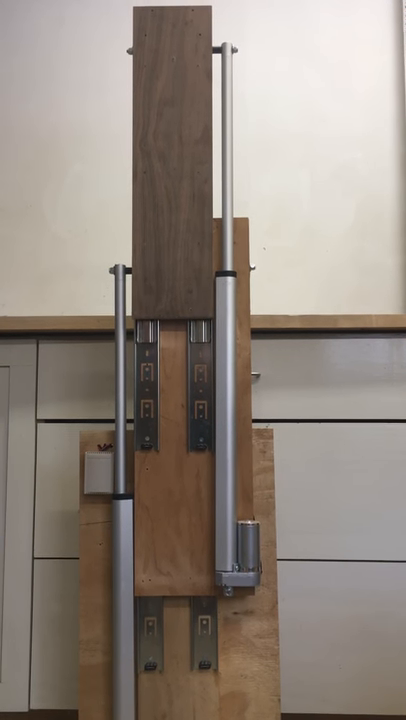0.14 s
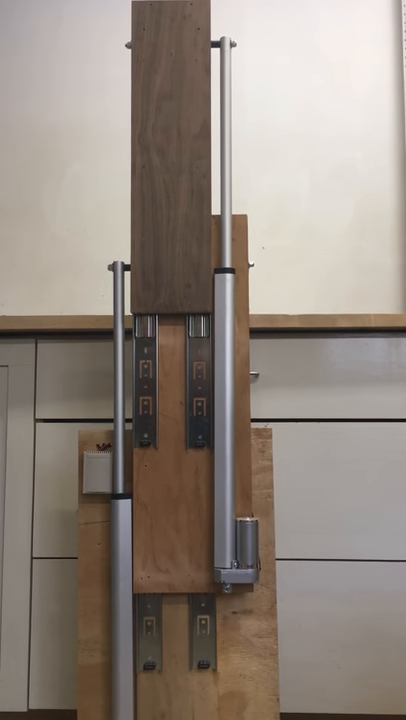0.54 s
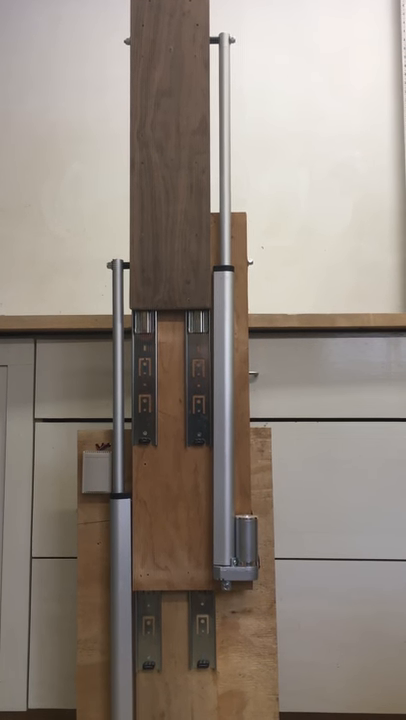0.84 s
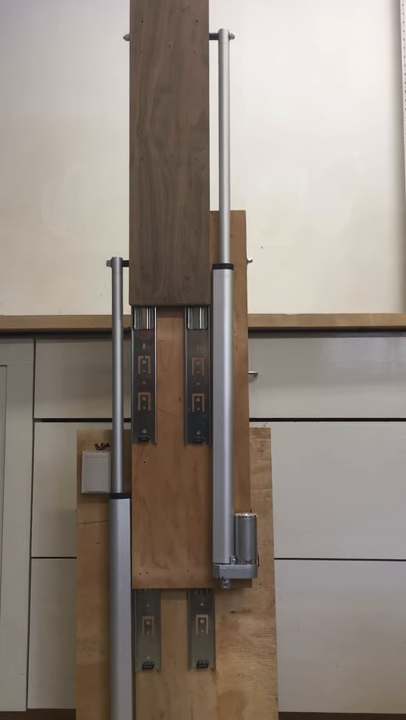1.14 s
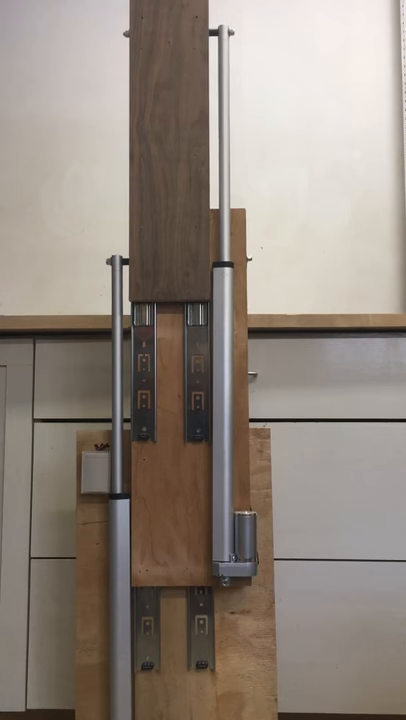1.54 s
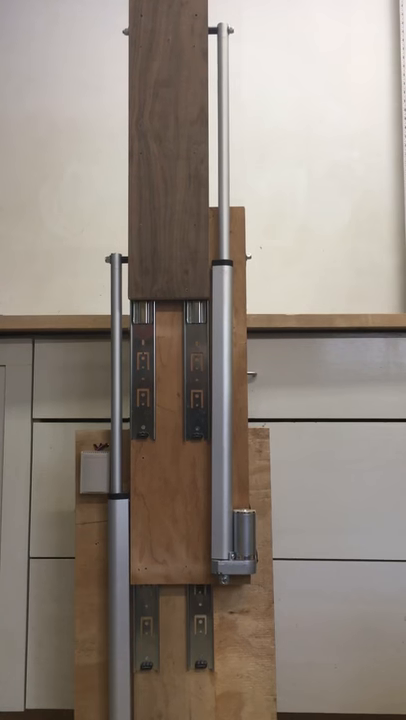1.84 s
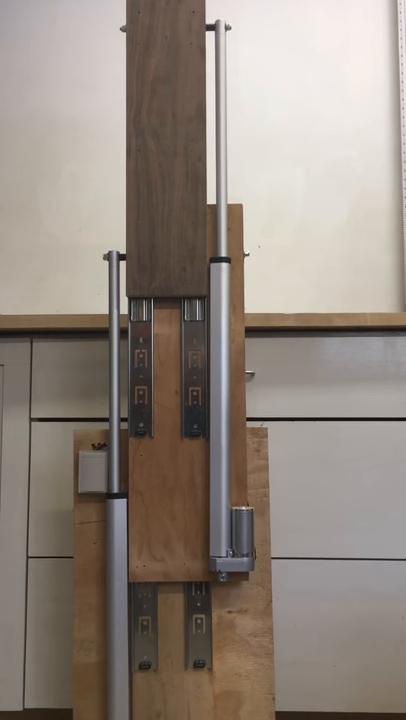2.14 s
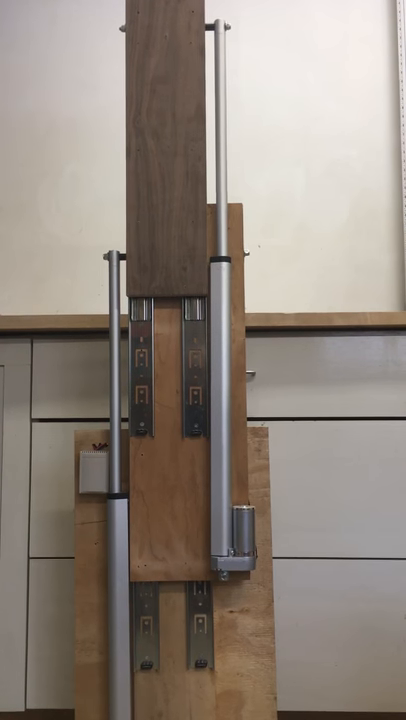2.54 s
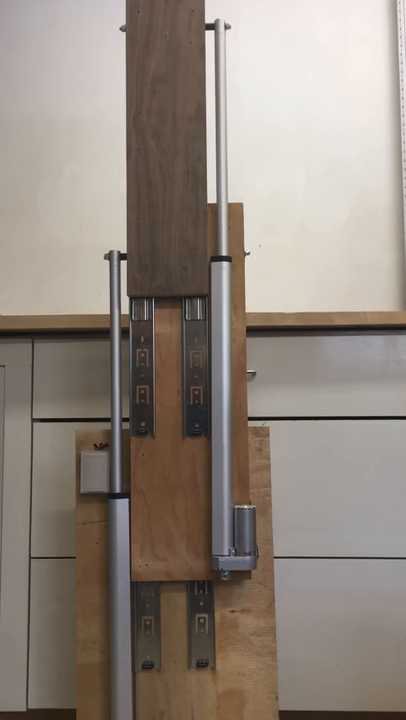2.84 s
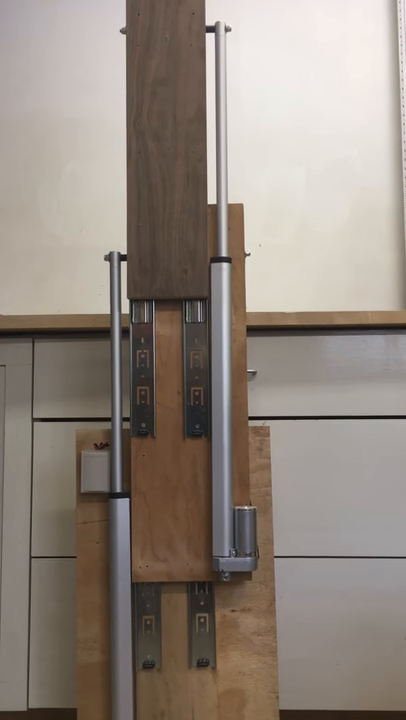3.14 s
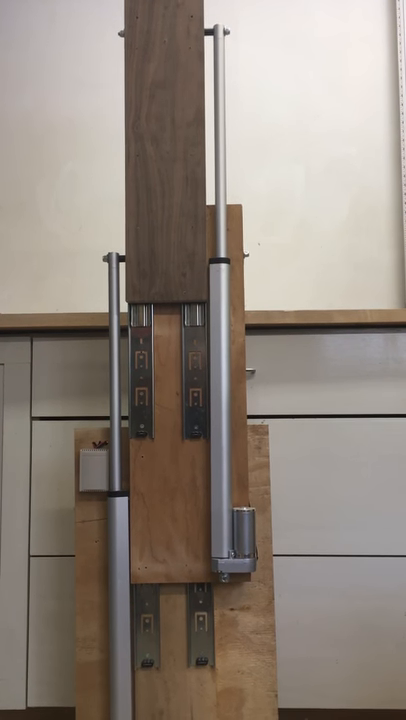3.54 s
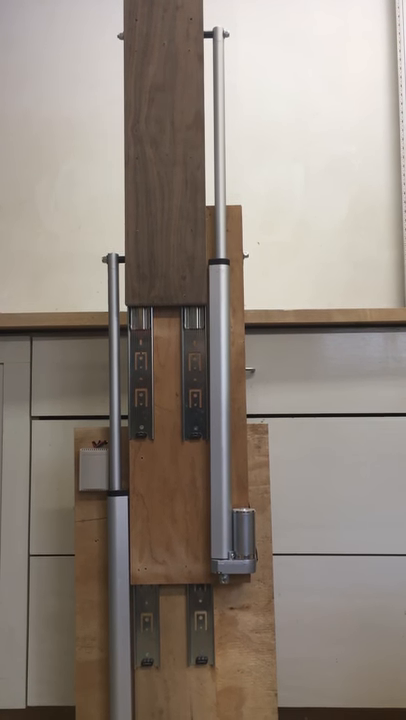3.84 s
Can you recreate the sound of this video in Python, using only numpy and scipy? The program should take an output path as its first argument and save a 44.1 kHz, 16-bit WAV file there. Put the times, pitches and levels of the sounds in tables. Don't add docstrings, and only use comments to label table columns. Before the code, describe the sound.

Geared motor whine with gritty tooth rattle halts, sharp clicks follow, and the whine restarts

```python
import sys
import numpy as np
from scipy import signal
from scipy.fft import rfft, irfft
from scipy.io import wavfile
from scipy.ndimage import uniform_filter1d

SR = 44100
rng = np.random.default_rng(int(sys.argv[2]) if len(sys.argv) > 2 else 0)


def invert_db(x):
    u = np.asarray(x, float) / 20
    return 10 ** u


def dump(signal):
    limited = np.clip(np.atleast_2d(signal).T, -1, 1)
    pcm = np.round(limited * 32767).astype(np.int16)
    wavfile.write(sys.argv[1], SR, pcm)


N = 176400


def level(x, db):
    return x * invert_db(db) / np.sqrt(np.mean(x ** 2) + 1e-30)


def ring(x, hz, width):
    b, a = signal.iirpeak(min(hz, SR * 0.45), max(hz / width, 0.3), fs=SR)
    return signal.lfilter(b, a, x)


def colour(x, points, peaks=()):
    hz, db = np.array(points, float).T
    f = np.maximum(np.arange(4097) * SR / 8192, 1)
    low_fall_db = 14 * np.minimum(np.log2(f / hz[0]), 0)
    power = invert_db(2 * (np.interp(np.log(f), np.log(hz), db) + low_fall_db))
    for centre, width, peak_db in peaks:
        power = power + invert_db(2 * peak_db) / (1 + ((f - centre * centre / f) / width) ** 2) ** 2
    cepstrum = irfft(np.log(power) / 2)
    cepstrum[1:4096] *= 2
    cepstrum[4097:] = 0
    response = irfft(np.exp(rfft(cepstrum)))
    return signal.fftconvolve(x, response)[:N]


def walk(rate):
    hold = int(SR / rate)
    steps = np.repeat(rng.standard_normal(N // hold + 1), hold)
    return 1.3 * uniform_filter1d(uniform_filter1d(steps, hold), hold)[:N]


def mesh_song(tones, turns, speed, go, flutter_db):
    wobble = turns + np.cumsum(speed * 0.001 * walk(29.93)) / SR
    song = np.zeros(N)
    for multiple, db in tones:
        phase = 2 * np.pi * (multiple * wobble + rng.random())
        song += np.sqrt(2) * invert_db(db + flutter_db * walk(25.04)) * np.sin(phase)
    coast = uniform_filter1d(1.0 * (np.gradient(speed) < 0), int(0.025 * SR))
    song = song * go ** (1 + 2.4) * invert_db(-1.5 * coast)
    return song + invert_db(-1.5) * ring(song, 1730, 43)


PINION, WHEEL = 9, 31
HUNT_DB = [2.5, 1, -2.5, 1, -2, 2.5, -2, 2.5, -2.5]


def tooth_rattle(turns, go, first_knock_s, knock_db, body, broad):
    teeth = (turns - turns[int(first_knock_s * SR)]) * PINION
    count = np.floor(teeth).astype(int)
    on_wheel, wheel_turn = count % WHEEL, count // WHEEL
    chance, wheel = rng.standard_normal((4000, 2)), rng.standard_normal(WHEEL)
    tooth_db = 1.93 * (chance[count % 4000, 0] + wheel[on_wheel]) / np.sqrt(2)
    high_tooth_db = knock_db + np.array(HUNT_DB)[wheel_turn % PINION] + chance[wheel_turn % 4000, 1]
    hit_db = tooth_db * (on_wheel > 0) + high_tooth_db * np.exp(-on_wheel / 1.2)
    puffs = np.exp(-(teeth - count) / 1.38) * go * rng.standard_normal(N)
    split_hz, low_share = 3930, 0.57
    low = signal.lfilter(*signal.butter(1, split_hz, "low", fs=SR), puffs * invert_db(low_share * hit_db))
    high = signal.lfilter(*signal.butter(1, split_hz, "high", fs=SR), puffs * invert_db(hit_db))
    return colour(low + high * go ** 2.9, broad, body)


def motor(run, tones, body, broad, knock_db, rattle_db, flutter_db, first_knock_s):
    run_s, run_hz = np.array(run, float).T
    speed = np.interp(np.arange(N) / SR, run_s, run_hz)
    turns = np.cumsum(speed) / SR
    go = (speed / run_hz.max()) ** 1.05
    song = mesh_song(tones, turns, speed, go, flutter_db)
    rattle = tooth_rattle(turns, go, first_knock_s, knock_db, body, broad)
    return song + level(rattle, rattle_db) * np.sqrt(np.mean(go ** 2))


# (time [s], speed [turns/s])
NEAR_UP_RUN = [
    (0, 72.42),
    (1.57, 72.42),
    (1.63, 73.08),
    (2.288, 73.08),
    (2.37, 34),
    (2.46, 0),
]
# (multiple of shaft speed [1], level [dB])
NEAR_UP_TONES = [(8, -65.5), (9, -57.5), (13, -66), (16, -70), (18, -64.5), (26, -64.5), (27, -57),
                 (33, -60.5)]
# (centre [Hz], width [Hz], level [dB])
NEAR_UP_BODY = [(218, 62, -26.5), (300, 35, -14), (642, 195, -15), (850, 60, -7), (948, 63, -13.5),
                (1290, 99, -15.5), (1950, 200, -13), (2421, 70, 0), (2634, 310, -9.5), (3315, 480, -12),
                (4520, 280, -20.5), (5350, 260, -18.5), (7290, 290, -18.5), (8500, 440, -18)]
# (frequency [Hz], level [dB per Hz])
NEAR_UP_COLOUR = [(480, -27), (600, -22), (2400, -13.5), (4000, -27.5), (9000, -27), (10300, -36.5),
                  (12000, -28.5), (15500, -38)]


def near_motor_up():
    return motor(NEAR_UP_RUN, NEAR_UP_TONES, NEAR_UP_BODY, NEAR_UP_COLOUR,
                 knock_db=10, rattle_db=-46.5, flutter_db=1.5, first_knock_s=0.0478)


# (time [s], speed [turns/s])
FAR_UP_RUN = [
    (0, 74.1),
    (1.57, 74.1),
    (1.64, 45),
    (1.72, 0),
]
# (multiple of shaft speed [1], level [dB])
FAR_UP_TONES = [(9, -52), (11, -65), (20, -67.5), (14.5, -63)]
# (centre [Hz], width [Hz], level [dB])
FAR_UP_BODY = [(210, 47, -12), (291.6, 27.8, -4.5), (667.4, 67, -1.5), (800, 63, -3.5), (939, 17, -1),
               (1121, 103, -4), (1370, 98, -6), (1780, 270, -11), (2020, 130, -8), (2367, 110, -1),
               (2557, 130, -8), (3300, 190, -15), (4370, 680, -17), (5800, 740, -24)]
# (frequency [Hz], level [dB per Hz])
FAR_UP_COLOUR = [(480, -41), (600, -10), (1500, -18.5), (3000, -17), (6000, -27.5), (9000, -33),
                 (10300, -32), (15500, -33)]


def far_motor_up():
    return motor(FAR_UP_RUN, FAR_UP_TONES, FAR_UP_BODY, FAR_UP_COLOUR,
                 knock_db=0, rattle_db=-44, flutter_db=1.77, first_knock_s=0.03)


def room(x):
    t60_s, gap_s, top_hz = 0.15, 0.0024, 7600
    t = np.arange(SR // 2) / SR
    tail = ring(rng.standard_normal(len(t)), top_hz / 3, top_hz)
    tail = tail * invert_db(-60 * t / t60_s) * (t > gap_s)
    return signal.fftconvolve(x, tail * invert_db(-10.5) / np.sqrt(np.sum(tail ** 2)))[:N]


# (frequency [Hz], level [dB per Hz])
FLOOR_COLOUR = [(30, -20), (70, 1), (105, -4), (135, -9), (330, -20), (1500, -27), (5000, -36),
                (16000, -44)]
# (centre [Hz], width [Hz], level [dB])
HUM = [(73.6, 14, -71), (86, 14, -77.5), (2070, 94, -80.5), (3330, 50, -88.5)]


def room_floor():
    out = level(colour(rng.standard_normal(N), FLOOR_COLOUR), -64.5)
    for hz, width, db in HUM:
        out += level(ring(rng.standard_normal(N), hz, width), db)
    return out


# (time [s], peak level [dB], low ring [Hz], high ring [Hz],
# length [ms])
CLICKS = [(2.2826, -28.5, 2730, 4040, 1.5), (2.293, -38, 2600, 4270, 3.5), (2.36, -49.5, 300, 210, 43),
          (2.915, -47, 300, 233, 36), (2.4524, -57, 2500, 4500, 3.4), (2.4782, -56, 2400, 4470, 5.6),
          (2.612, -60, 1700, 2400, 1.5), (2.6683, -62, 3260, 4970, 2), (2.8156, -26, 1700, 4630, 0.42),
          (2.9117, -25.5, 3300, 9200, 0.65), (2.9136, -20.5, 3250, 12800, 1.34),
          (2.919, -30.5, 850, 3800, 11.5), (2.918, -43, 8500, 12600, 20), (3.0485, -36.5, 5800, 12500, 3.1),
          (3.0689, -36, 4180, 6000, 4.3), (3.0858, -21.5, 2240, 4230, 0.29)]


def clicks():
    out, t = np.zeros(N), np.arange(4000) / SR
    for start_s, peak_db, low_hz, high_hz, length_ms in CLICKS:
        crack = rng.standard_normal(len(t)) * np.exp(-t * 1000 / length_ms)
        click = level(np.diff(crack, prepend=0), -5.5)
        for hz in (low_hz, high_hz):
            click += level(ring(crack, hz, hz * 0.55), 0)
        i = int(start_s * SR)
        out[i:i + len(t)] += click * invert_db(peak_db) / abs(click).max()
    return out


# (time [s], speed [turns/s])
NEAR_DOWN_RUN = [
    (2.912, 0),
    (2.935, 52),
    (2.98, 61),
    (3.03, 64.3),
    (3.09, 66.4),
    (3.105, 70),
    (3.19, 71.35),
    (4, 71.8),
]
# (multiple of shaft speed [1], level [dB])
NEAR_DOWN_TONES = [(4, -68), (8, -58), (9, -59), (16, -68.5), (18, -55.5), (24, -70), (27, -48), (28, -52),
                   (36, -60), (45, -60)]
# (centre [Hz], width [Hz], level [dB])
DOWN_BODY = [(210, 46, -13.5), (288, 38, -9), (687, 210, -14), (1160, 160, -21), (1783, 97, -4.5),
             (2017, 160, -6.5), (2400, 106, -1.5), (2600, 160, -7.5), (3270, 270, -13.5),
             (4420, 190, -19.5), (5440, 340, -23.5), (7400, 540, -23.5), (8800, 1200, -27.5),
             (14100, 900, -33)]
# (frequency [Hz], level [dB per Hz])
DOWN_COLOUR = [(480, -35), (600, -20), (2000, -14), (3000, -21), (9000, -30), (10300, -35), (12000, -32.5),
               (15500, -36.5)]


def near_motor_down():
    return motor(NEAR_DOWN_RUN, NEAR_DOWN_TONES, DOWN_BODY, DOWN_COLOUR,
                 knock_db=3.2, rattle_db=-45, flutter_db=1.8, first_knock_s=3.137)


# (time [s], speed [turns/s])
FAR_DOWN_RUN = [
    (3.07, 0),
    (3.095, 72),
    (3.13, 77.5),
    (3.2, 78.4),
    (4, 78.7),
]
# (multiple of shaft speed [1], level [dB])
FAR_DOWN_TONES = [(8, -56.5), (9, -62), (18, -54.5), (21, -70)]


def far_motor_down():
    return motor(FAR_DOWN_RUN, FAR_DOWN_TONES, DOWN_BODY, DOWN_COLOUR,
                 knock_db=0, rattle_db=-53.5, flutter_db=3.3, first_knock_s=3.15)


def scene():
    sources = near_motor_up() + far_motor_up() + clicks() + near_motor_down() + far_motor_down()
    return (sources + room(sources) + room_floor())[None]


def roll_off(x):
    return signal.sosfilt(signal.butter(12, 16530, fs=SR, output="sos"), x)


def record(dry):
    top_cut = signal.ellip(6, 0.3, 50, 15500, fs=SR, output="sos")
    mix = signal.sosfilt(top_cut, dry)
    return roll_off(mix)


dry = scene()
out = record(dry)
dump(out)
```